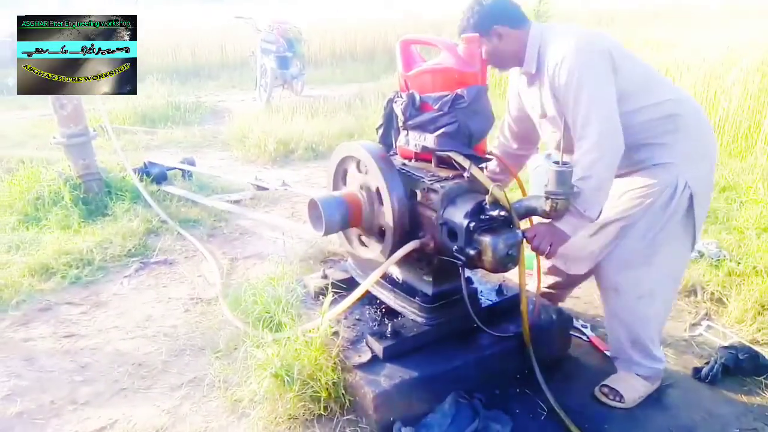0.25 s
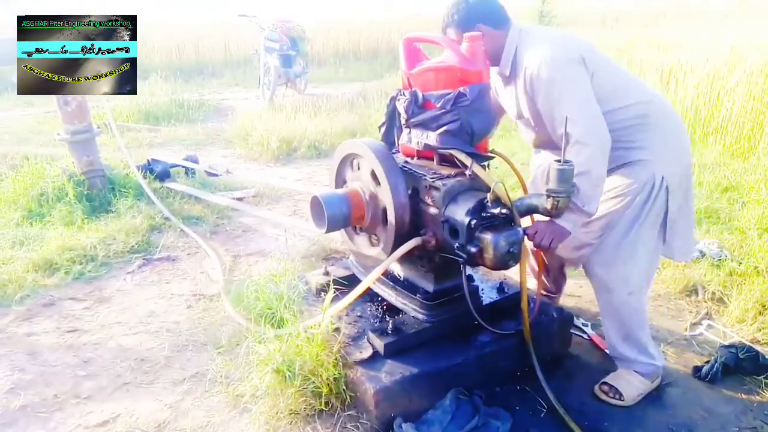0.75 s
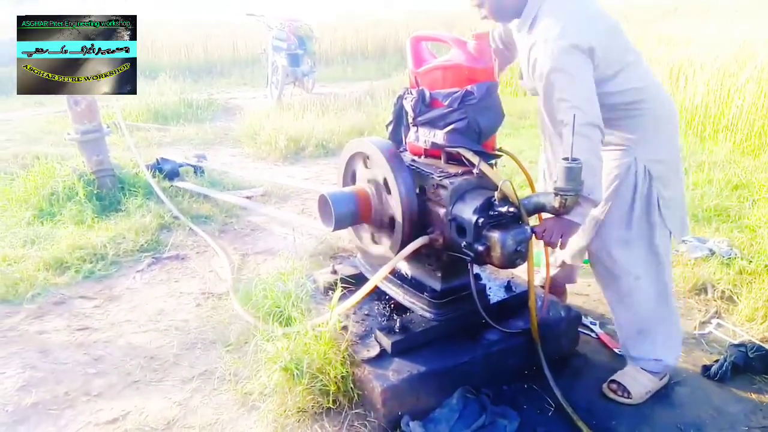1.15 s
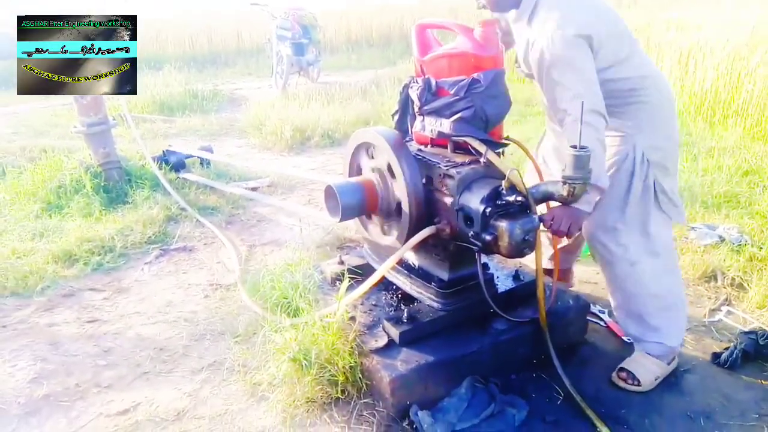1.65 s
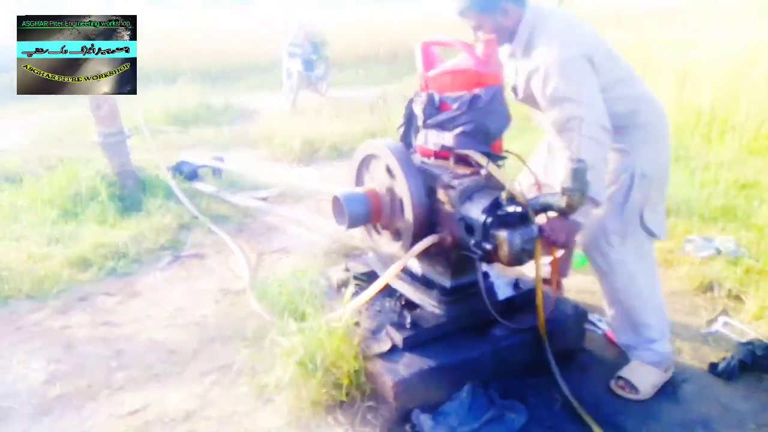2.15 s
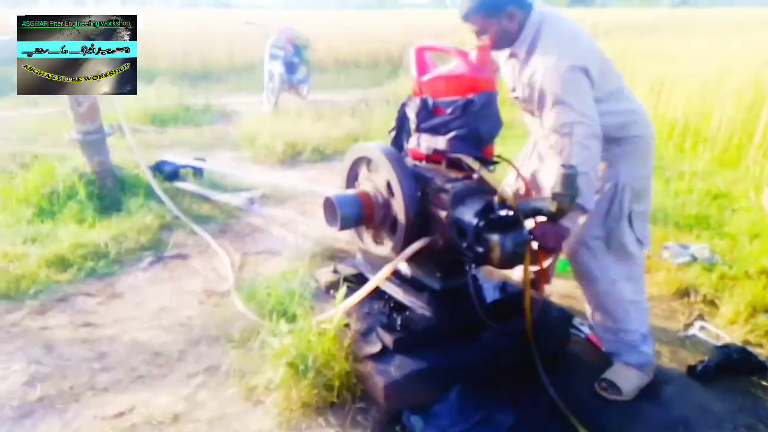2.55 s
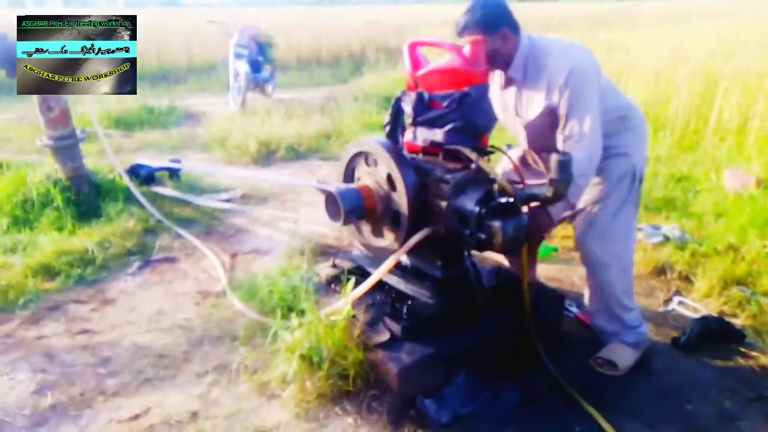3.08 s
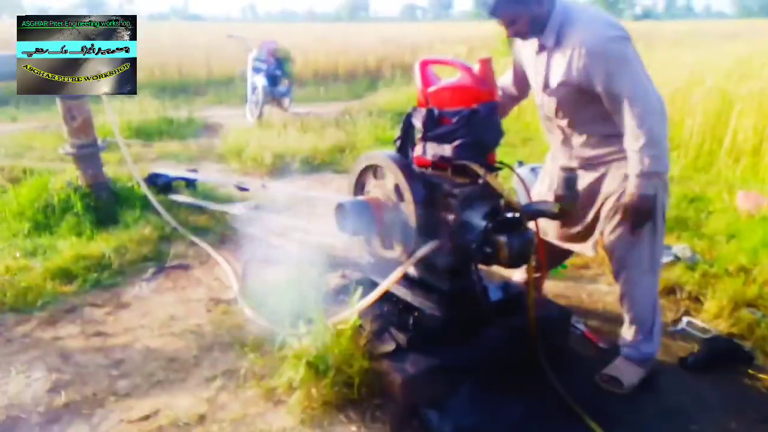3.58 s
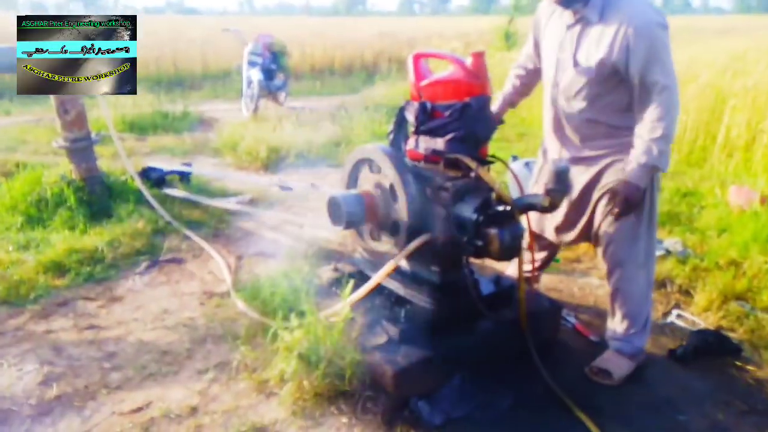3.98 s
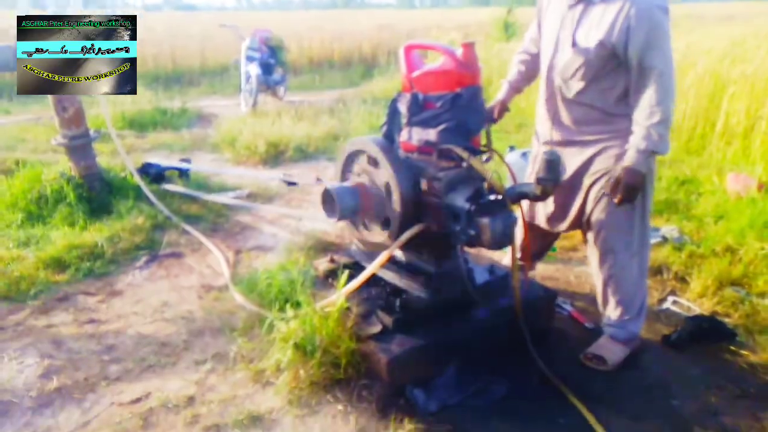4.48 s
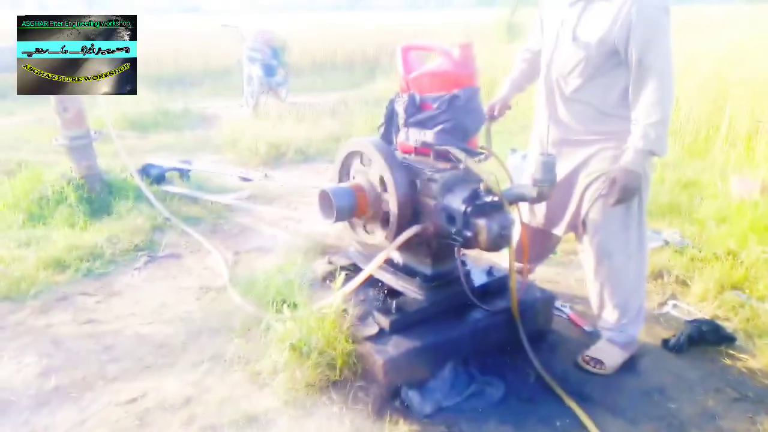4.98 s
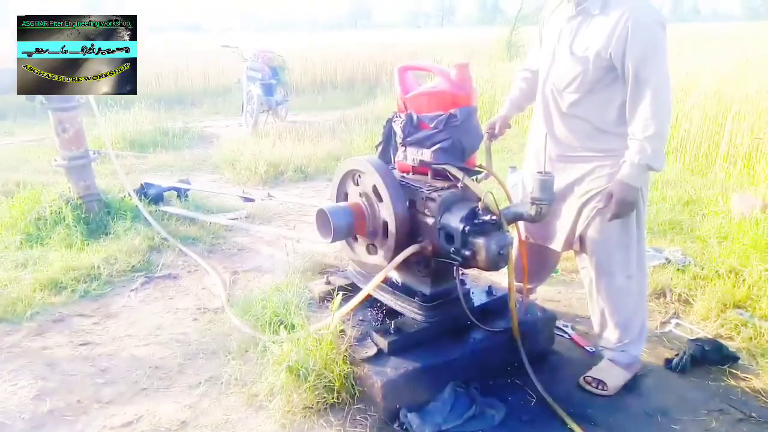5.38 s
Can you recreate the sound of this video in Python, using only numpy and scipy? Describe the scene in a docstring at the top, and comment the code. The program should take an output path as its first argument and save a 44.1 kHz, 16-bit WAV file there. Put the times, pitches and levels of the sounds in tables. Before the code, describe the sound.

Close outdoor phone recording of someone cranking an old cast-iron engine. Rhythmic breathy strokes past the valve speed up over a dull mechanical hum, with ticking tappets and a sharp clank. Low exhaust coughs follow, but it fails to catch; knocks thin out and the hum fades into quiet low background noise. Loud handling thumps interrupt early and late, and finger taps and rubbing close it.

```python
"""Hand-cranked diesel, not catching

A single-cylinder diesel is cranked by hand in a field, coughs and runs down without catching.
Noise excites the resonances of the cast-iron block, case and valve port: growl, hum and puffs of air.
Tappets tick as filtered noise bursts, crank knocks are decaying tones, coughs are slow pressure waves.
Fingers bump, tap and rub the phone: damped swings of its diaphragm, clicks of its shell and noise."""
import sys
import numpy as np
from scipy import signal
from scipy.fft import rfft, irfft, next_fast_len
from scipy.io import wavfile
from scipy.ndimage import uniform_filter1d, map_coordinates

SR = 44100
rng = np.random.default_rng(int(sys.argv[2]) if len(sys.argv) > 2 else 0)


def to_wav(s):
    """Save 16-bit WAV."""
    ch = np.atleast_2d(s).T  # columns
    pcm = np.round(np.clip(ch, -1, 1) * 32767)  # PCM
    wavfile.write(sys.argv[1], SR, pcm.astype(np.int16))


N = 248088


def amp(db):
    """Decibel law: 20 dB is a tenfold amplitude."""
    return 10 ** (np.asarray(db) / 20)


def unit(x):
    """Normalization to a root-mean-square of 1."""
    return x / np.sqrt(np.mean(x ** 2) + 1e-20)


def curves(rows):
    """Linear interpolation: one value per sample for each column after the time."""
    seconds, *columns = np.transpose(rows)
    return [np.interp(np.arange(N) / SR, seconds, column) for column in columns]


def wobble(rate):
    """Spline interpolation: a smooth random curve through rate knots a second."""
    knots = rng.standard_normal(int(N * rate / SR) + 4)
    return map_coordinates(knots, [np.arange(N) * rate / SR])


def swell(s, rise, fall):
    """Gaussian envelope in time, peaking at s seconds, with its own rise and fall."""
    t = np.arange(N) / SR - s
    return np.exp(-(t / np.where(t < 0, rise, fall)) ** 2)


def filtered(x, response):
    """Linear filtering: the spectrum of x times a complex response of frequency."""
    size = next_fast_len(len(x) + 8192)
    spectrum = rfft(x, size) * response(np.fft.rfftfreq(size, 1 / SR))
    return irfft(spectrum, size)[:len(x)]


def shape(points):
    """Spectral envelope: the gain of (Hz, dB) points on a log frequency axis."""
    point_hz, db = np.transpose(points)
    return lambda hz: amp(np.interp(np.log(hz + 1), np.log(point_hz + 1), db))


def modes(table):
    """Modal superposition: causal resonances summed with alternating sign."""
    def mode(f, center, width, db):
        return amp(db) * 1j * f * width / (center * center - f * f + 1j * f * width)
    return lambda f: sum((-1) ** k * mode(f, *row) for k, row in enumerate(table))


def grit(response, rate, lumpy_db):
    """Amplitude-modulated noise: it comes in uneven lumps, coloured, rms 1."""
    lumps = amp(lumpy_db * wobble(rate))
    return unit(filtered(lumps * rng.standard_normal(N), response))


def patchy(response, wide, long, patchy_db):
    """Time-frequency modulation: noise whose bands come and go on their own, coloured, rms 1."""
    bands = signal.stft(rng.standard_normal(N), nperseg=256)[2]
    patches = uniform_filter1d(rng.standard_normal(bands.shape), size=wide, axis=0)
    patches = uniform_filter1d(patches, size=long, axis=1)
    noise = signal.istft(bands * amp(patchy_db * unit(patches)), nperseg=256)[1][:N]
    return unit(filtered(noise, response))


def add(x, s, sound):
    """Superposition: mix a sound into x at s seconds."""
    part = x[round(s * SR):][:len(sound)]
    part += sound[:len(part)]


# Walls of the block. Each row: resonance in Hz, width in Hz, relative level in dB.
BLOCK_MODES = [(606, 106, 2.5), (820, 109, 6), (939, 138, 1.5), (1272, 245, -4), (1874, 525, -13)]


def block(f):
    """Structural resonance: the block's modes; cast iron passes little above 2 kHz."""
    return modes(BLOCK_MODES)(f) / (1 + (f / 2200) ** 6) / (1 + (520 / (f + 1)) ** 4)


# Valve port and head. Each row: resonance in Hz, width in Hz, relative level in dB.
PORT_MODES = [(2467, 71, 12), (3040, 366, 8.5), (3797, 260, 13.5), (4305, 300, 10), (4750, 670, 4.5),
              (5640, 1020, -0.5), (6260, 510, 1.5), (7040, 180, 1.5)]


def head(f):
    """Cavity resonance: the port's modes, dark below 2 kHz and above 7.5 kHz."""
    return modes(PORT_MODES)(f) / (1 + (2200 / (f + 1)) ** 6) / (1 + (f / 7300) ** 14)


# Levels of the steady sounds; the hiss near 5.47 s is a hand rubbing. Each row: time in seconds,
# then relative levels in dB of gear growl, crankcase hum, airy hiss and frame rumble.
STEADY_LEVELS = [(0.0, -40, -42, -60, -48), (0.3, -46, -38, -63, -51), (0.53, -41, -39.5, -60.5, -53.5),
                 (0.85, -42, -37, -57.5, -52), (1.06, -40, -38.5, -60, -46), (1.27, -40.5, -37, -54, -50),
                 (1.88, -37.5, -36.5, -56, -51), (2.55, -36.5, -34, -47, -48),
                 (2.71, -33.5, -35.5, -51, -50), (3.01, -40, -36.5, -56, -48.5),
                 (3.16, -38, -38, -53.5, -49.5), (3.35, -43.5, -41.5, -65, -50.5),
                 (3.63, -42.5, -42, -58, -56), (3.81, -44.5, -44.5, -60, -52),
                 (4.14, -52, -49.5, -70.5, -53), (4.51, -51, -48.5, -61, -56.5), (4.73, -55, -52, -78, -69),
                 (4.93, -55, -53.5, -76, -64.5), (5.06, -56, -51, -81, -59), (5.25, -56, -50.5, -79, -59.5),
                 (5.47, -65, -65, -52, -64.5), (5.63, -45, -60, -71, -71)]
# Spectrum of the frame rumble. Each row: frequency in Hz, relative level in dB per Hz.
FRAME_SPECTRUM = [(15, -68.5), (25, -55), (85, -1.5), (167, -3.5), (199, -4.5), (220, -24.5), (290, 12),
                  (480, -120)]
SURGE_DB, SURGE_S = 4, 0.11  # the gears growl harder around each stroke; rise and fall time


def turning():
    """Forced vibration: loose gear teeth shake block and frame, under a patchy airy hiss."""
    growl_db, _, hiss_db, rumble_db = curves(STEADY_LEVELS)
    surge_db = SURGE_DB * sum(swell(s, SURGE_S, SURGE_S) for s, _ in STROKE_TIMES)
    growl = amp(growl_db + surge_db + 0.28) * grit(block, rate=70, lumpy_db=2.6)
    rumble = amp(rumble_db + 6.0) * grit(shape(FRAME_SPECTRUM), rate=14, lumpy_db=0.5)
    airy_hiss = amp(hiss_db - 2.2) * patchy(head, wide=3, long=18, patchy_db=7.5)
    return growl + rumble + airy_hiss


# Crankcase walls. Each row: resonance in Hz, width in Hz, relative level in dB.
CASE_MODES = [(281.7, 70.2, 0.5), (218, 107, -5.5), (358, 17, -21.5)]


def hum():
    """Frequency modulation: the case sings on one wavering note inside its noisy ring."""
    note_hz = 279 + 8.5 * wobble(45)
    note = np.sin(2 * np.pi * np.cumsum(note_hz) / SR)
    ring = grit(lambda f: modes(CASE_MODES)(f) / (1 + (f / 600) ** 3), rate=30, lumpy_db=2.5)
    return amp(curves(STEADY_LEVELS)[1]) * (1.15 * amp(1.8 * wobble(rate=22)) * note + 1.2 * ring)


def chatter():
    """Random impact train: faint ticks at random, their level following the airy hiss."""
    hits = (rng.random(N) < 70 / SR) * amp(3.3 * rng.standard_normal(N))  # about 70 a second
    t = np.arange(SR // 50) / SR
    decay = amp(-60 * t / 0.039)
    shake = signal.fftconvolve(hits, decay)[:N] * rng.standard_normal(N)
    return amp(curves(STEADY_LEVELS)[2] - 5.5) * unit(filtered(shake, head))


# Spectrum of the far field. Each row: frequency in Hz, relative level in dB per Hz.
FIELD_SPECTRUM = [(40, -17.5), (100, -6.5), (280, -10), (450, -12.5), (800, 0), (1400, -29), (2300, -50.5),
                  (3900, -37), (6200, -35.5), (7600, -53), (9000, -75.5)]


def far_field():
    """Diffuse background: a steady low noise whose bands come and go."""
    return amp(-57.5) * patchy(shape(FIELD_SPECTRUM), wide=3, long=25, patchy_db=4.5)


def microphone_hiss():
    """Noise floor: high-passed random noise of the microphone."""
    treble = lambda f: 1 / (1 + (7000 / (f + 1)) ** 4)
    return amp(-87) * unit(filtered(rng.standard_normal(N), treble))


# Tappet and valve ticks. Each row: start in seconds, relative level in dB, kind of contact.
TAPPET_TICKS = [(0.02, -31.5, "short"), (0.113, -45, "short"), (0.1655, -34.5, "bright"),
                (0.23, -44, "dull"), (0.4775, -41.5, "low"), (0.6772, -43, "dull"),
                (0.735, -34.5, "bright"), (0.881, -41.5, "low"), (1.134, -32.5, "dull"),
                (1.176, -44, "dull"), (1.2316, -33.5, "bright"), (1.2719, -41.5, "dull"),
                (1.3634, -38, "low"), (1.4818, -31, "low"), (1.612, -39, "dull"), (1.6876, -32.5, "bright"),
                (1.7313, -42, "dull"), (1.8104, -43, "bright"), (1.918, -30.5, "low"),
                (2.0366, -33, "short"), (2.1102, -32.5, "bright"), (2.165, -42, "bright"),
                (2.3263, -30, "low"), (2.37, -35, "dull"), (2.4422, -32, "short"),
                (2.5092, -35.5, "bright"), (2.5332, -27, "dull"), (2.6495, -32, "low"),
                (2.774, -39, "high"), (2.9789, -37, "dull"), (3.145, -34, "low"), (3.1885, -32.5, "low"),
                (3.245, -36.5, "low"), (3.2912, -44, "low"), (3.5425, -38, "low"), (3.571, -37.5, "dull"),
                (3.715, -39, "dull"), (3.908, -45, "dull"), (4.29, -35, "dull"), (4.376, -38, "short"),
                (4.4394, -45, "high"), (4.5239, -38, "dull")]
# Each kind of contact: relative brightness in dB, 60 dB decay time in seconds, note in Hz.
CONTACT_KINDS = {"bright": (-14.5, .045, 4150), "dull": (-33, 0.065, 3680), "low": (-31.5, 0.073, 1910),
                 "short": (-9, 0.024, 2930), "high": (-20, .09, 5000)}


def ticks():
    """Impact of steel on steel: noise rattles the head, each part's own note and a bright edge."""
    dull, notes, bright = np.zeros(N), np.zeros(N), np.zeros(N)
    t = np.arange(SR // 10) / SR
    for s, db, kind in TAPPET_TICKS:
        bright_db, t60, hz = CONTACT_KINDS[kind]
        envelope = amp(db - 60 * t / t60) * (1 - 0.3 * np.exp(-t / 0.0006))
        rattle = envelope * rng.standard_normal((3, len(t)))
        add(dull, s, rattle[0])
        add(notes, s, filtered(rattle[1], lambda f: modes([(hz, 0.3 * hz, 0)])(f) ** 2))
        add(bright, s, amp(bright_db) * rattle[2])
    edge = lambda f: modes([(6900, 3000, 0)])(f) / (1 + (f / 8500) ** 9)
    return amp(-5.5) * filtered(dull, head) + amp(8.0) * notes + amp(6.5) * filtered(bright, edge)


# Slow air whistling faintly past the valve seat. Each row: peak in seconds, half length in seconds,
# relative level in dB.
SEAT_WHEEZES = [(0.324, 0.037, -61), (0.86, 0.032, -61), (1.776, 0.044, -69), (4.034, 0.056, -61.5),
                (4.273, 0.017, -74.5), (4.537, 0.1, -61), (4.786, 0.044, -64), (4.976, 0.07, -68),
                (5.247, 0.059, -71), (5.576, 0.047, -61)]
# Bands of the valve seat. Each row: resonance in Hz, width in Hz before squaring, relative level in dB.
SEAT_BANDS = [(4000, 720, 0.5), (6020, 510, -2.5)]


def wheezes():
    """Narrow-band flow noise: bands of air noise at the valve seat swell together."""
    gain = sum(amp(db) * swell(s, half, half) for s, half, db in SEAT_WHEEZES)
    air = np.zeros(N)
    for hz, width, db in SEAT_BANDS:
        air += amp(db) * grit(lambda f: modes([(hz, width, 0)])(f) ** 2, rate=23, lumpy_db=3.5)
    return gain * air


def stroke(s, turn, db, rise, fall, fizz_db, growl_db):
    """Shared envelope: gains of a jet in port, open air and block; rise and fall are shares of the turn."""
    return swell(s, rise * turn, fall * turn) * amp([[db], [db + fizz_db], [db + growl_db]])


# Piston strokes past the open valve. Each row: peak in seconds, level in dB.
STROKE_TIMES = [(0.4190, -40.0), (0.9570, -32.0), (1.4380, -32.0), (1.8710, -28.5), (2.2920, -26.0)]
# Of a stroke, relative to its port sound: fizz in dB, growl in dB.
STROKE_COLOUR = (-25.0, 1.5)
# The softer return stroke: rise and fall in turns, fizz and growl in dB relative to its port sound.
RETURN_STROKE = (.12, .1, -21, -10)
# Short spurts of air. Each row: peak in seconds, half length in seconds, level in dB, then
# fizz and growl in dB relative to that level.
AIR_SPURTS = [(0.617, .011, -45, -29, 13), (2.175, 0.014, -46, -33, 14.5), (2.706, 0.0095, -41, -53, 9.5),
              (2.834, 0.0052, -37, -18, -16), (2.938, 0.021, -48, -28, -8), (3.092, 0.0073, -43, -40, 8.5),
              (3.386, 0.024, -47, -27, 10), (4.053, 0.013, -46.5, -21, 1), (4.976, 0.021, -67, -30, 12)]
# Top of the air jet. Each row: frequency in Hz, relative level in dB per Hz.
FIZZ_SPECTRUM = [(6500, -28), (7600, -2.5), (9500, -13.5), (11000, -15.5), (13200, -20.5), (14500, -25.5),
                 (15800, -32)]
STROKE_RISE, STROKE_FALL = 0.057, 0.033  # shares of a turn
RETURN_TURNS, RETURN_DB = 0.16, -50  # how late the return stroke comes, its level
LAST_TURN_S = 0.41


def puffs():
    """Jet noise: each stroke swells and dies, a softer one follows; it sounds in port, open air and block."""
    times, levels = np.transpose(STROKE_TIMES)
    turns = np.append(np.diff(times), LAST_TURN_S)
    gains = np.zeros((3, N))
    for s, turn, db in zip(times, turns, levels):
        gains += stroke(s, turn, db, STROKE_RISE, STROKE_FALL, *STROKE_COLOUR)
        gains += stroke(s + RETURN_TURNS * turn, turn, RETURN_DB, *RETURN_STROKE)
    for s, half, db, fizz_db, growl_db in AIR_SPURTS:
        gains += stroke(s, half, db, 1, 1, fizz_db, growl_db)
    port = grit(head, rate=280, lumpy_db=3.2)
    fizz = grit(shape(FIZZ_SPECTRUM), rate=450, lumpy_db=2.5)
    growl = grit(block, rate=83, lumpy_db=0.0)
    return np.sum(gains * [port, fizz, growl], axis=0)


# Crank and gear knocks. Each row: start in seconds, relative level in dB, note in Hz, kind.
CRANK_KNOCKS = [(0.439, -25.5, 618, "knock"), (1.478, -23.5, 995, "ring"), (1.748, -25, 859, "ring"),
                (1.821, -26.5, 903, "knock"), (1.915, -22, 966, "ring"), (2.171, -22.5, 934, "ring"),
                (2.221, -21.5, 818, "knock"), (2.324, -18.5, 980, "ring"), (2.349, -12, 840, "snap"),
                (2.577, -21.5, 842, "knock"), (2.618, -21, 818, "knock"), (2.68, -26, 880, "ring"),
                (2.768, -20.5, 814, "snap"), (2.885, -24.5, 777, "knock"), (3.069, -23, 730, "snap"),
                (3.145, -23.5, 1267, "ring"), (3.183, -20, 1390, "snap"), (3.248, -23, 860, "snap"),
                (3.291, -23, 707, "snap"), (3.387, -30.5, 784, "ring"), (3.546, -22, 786, "snap"),
                (3.85, -22, 846, "snap"), (4.022, -25.5, 764, "knock"), (4.219, -26.5, 816, "snap"),
                (4.321, -31.5, 782, "knock"), (4.479, -33, 800, "ring"), (4.499, -35.5, 746, "knock"),
                (4.691, -34, 633, "knock"), (4.966, -36.5, 727, "ring"), (5.19, -32.5, 843, "ring")]
# Each kind of knock: 60 dB decay time in seconds.
KNOCK_DECAYS = {"snap": 0.027, "knock": 0.055, "ring": 0.089}


def knocks():
    """Damped free vibration: slack taken up in the drive rings one wall, roughened by noise of the block."""
    out, t = np.zeros(N), np.arange(SR // 8) / SR
    for s, db, hz, kind in CRANK_KNOCKS:
        roughness = unit(filtered(rng.standard_normal(len(t)), block))
        ring = np.sin(2 * np.pi * hz * t) + 0.51 * roughness
        envelope = amp(db - 60 * t / KNOCK_DECAYS[kind]) * (1 - np.exp(-t / 0.0015))
        add(out, s, envelope * ring)
    return out


def touch(rows):
    """Damped oscillation: a touch throws the diaphragm, which swings ever more slowly; the shell clicks."""
    out, t = np.zeros(N), np.arange(SR // 8) / SR
    for s, db, first, t60, click_db in rows:
        onset = 1 - np.exp(-(t / (0.18 * first)) ** 2)
        swing = -np.sin(np.pi * (t / first) ** 0.49) * amp(-60 * t / t60) * onset
        shell = np.sin(2 * np.pi * 3800 * t) + 0.15 * rng.standard_normal(len(t))
        click = amp(click_db - 60 * t / 0.0025) * shell
        add(out, s, amp(db) * (swing + click))
    return out


# Hard bumps on the phone. Each row: start in seconds, blow level in dB, rebound level in dB,
# first swing of the rebound in seconds.
HARD_BUMPS = [(1.013, -2.5, -17, .0019), (4.0767, -2.5, -14.5, .0013)]
# The blow: first swing in seconds, 60 dB decay time in seconds, click in dB relative to the swing.
BUMP_BLOW = (.0011, .084, -18)
# The soft push before the rebound: delay in seconds, level in dB relative to the blow, first swing
# in seconds, 60 dB decay time in seconds, click in dB relative to the swing.
BUMP_PUSH = (.088, -24, .003, .07, -38)
# The rebound: delay in seconds, 60 dB decay time in seconds, click in dB relative to the swing.
BUMP_REBOUND = (.1066, .04, -37)
# Finger taps on the shell. Each row: start in seconds, level in dB, first swing in seconds,
# click in dB relative to the swing.
FINGER_TAPS = [(5.2946, -30, 0.0029, -2), (5.3055, -15, 0.0003, -22), (5.3288, -20, 0.0011, -41),
               (5.3817, -12.5, 0.0012, 3), (5.3962, -38, 0.0004, 9), (5.4056, -34.5, 0.00048, 6)]
# Rubbing. Each row: time in seconds, level in dB.
RUB_LEVELS = [(5.28, -88), (5.3, -51.5), (5.345, -45.5), (5.4, -45.5), (5.42, -45), (5.435, -35),
              (5.49, -49.5), (5.55, -54.5), (5.6, -50), (5.63, -39)]
# Skin on the phone shell. Each row: frequency in Hz, relative level in dB per Hz.
RUB_SPECTRUM = [(40, -19), (80, 2.5), (150, -2.5), (400, -18), (1100, -10), (2700, -17), (6400, -25),
                (7600, -49.5), (10000, -60.5), (14000, -54), (15500, -44.5)]
TAP_SWINGS = 9.7  # 60 dB decay time of a tap, in first swings


def handling():
    """Contact excitation: a bump is blow, push and rebound; fingertips tap and skin rubs the shell."""
    push_late, push_db, *push = BUMP_PUSH
    rebound_late, *rebound = BUMP_REBOUND
    bumps = []
    for s, db, rebound_db, first in HARD_BUMPS:
        bumps.append((s, db, *BUMP_BLOW))
        bumps.append((s + push_late, db + push_db, *push))
        bumps.append((s + rebound_late, rebound_db, first, *rebound))
    taps = [(s, db, first, TAP_SWINGS * first, click_db) for s, db, first, click_db in FINGER_TAPS]
    hard = filtered(touch(bumps), lambda f: 1 / (1 + 1j * f / 13000) ** 3)
    soft = filtered(touch(taps), lambda f: 1 / (1 + 1j * f / 9000) ** 3 / (1 + (f / 7000) ** 8))
    rub = amp(curves(RUB_LEVELS)[0]) * grit(shape(RUB_SPECTRUM), rate=74, lumpy_db=2.0)
    return hard + soft + rub


# Coughs in the exhaust pipe. Each row: start in seconds, level in dB, starting pitch in Hz,
# rise in Hz per second, time from start to envelope peak in seconds.
EXHAUST_COUGHS = [(2.689, -40, 126, 4.8, 0.012), (2.838, -24.5, 118, 5, 0.0094),
                  (3.383, -31, 74, 600, 0.023), (3.538, -31.5, 132, 5, 0.0066)]


def coughs():
    """Pressure pulse: a weak charge pushes a few slow waves out of the pipe, one of them gliding up in pitch."""
    out, t = np.zeros(N), np.arange(SR // 4) / SR
    for s, db, hz, rise, length in EXHAUST_COUGHS:
        envelope = np.e * t / length * np.exp(-t / length)
        add(out, s, amp(db) * envelope * np.sin(2 * np.pi * (hz + rise * t / 2) * t))
    return out


# The steady sound dips briefly. Each row: lowest point in seconds, fall in seconds,
# return in seconds, relative depth in dB.
LEVEL_DIPS = [(1.002, .025, 0.034, -13), (3.228, .018, .045, -13), (3.895, .026, .06, -12),
              (4.073, .013, .06, -11), (4.79, .04, .07, -12)]
HUM_DIPS, FIELD_DIPS = 1.6, 0.6  # the hum dips deeper than the rest, the far field less, dB per dB


def scene():
    """Superposition of all sources; the steady ones and the puffs share brief dips in level."""
    dips_db = sum(db * swell(s, fall, back) for s, fall, back, db in LEVEL_DIPS)
    engine = amp(HUM_DIPS * dips_db) * hum()
    engine += amp(dips_db) * (turning() + puffs() + wheezes() + chatter())
    background = amp(FIELD_DIPS * dips_db) * far_field() + microphone_hiss()
    return (engine + ticks() + knocks() + coughs() + handling() + background)[None]


def record(dry):
    """Band limitation: the phone keeps nothing from 15830 Hz up."""
    return filtered(dry[0], lambda hz: hz < 15830)[None]


dry = scene()
out = record(dry)
to_wav(out)
```